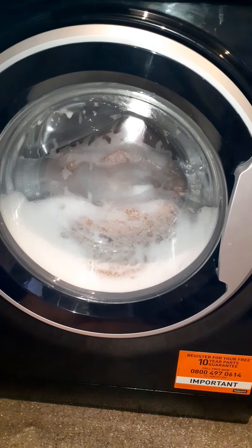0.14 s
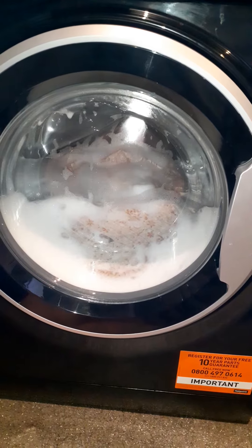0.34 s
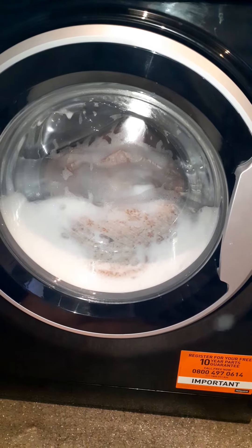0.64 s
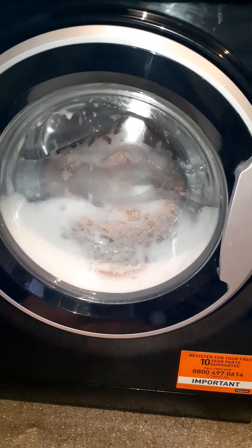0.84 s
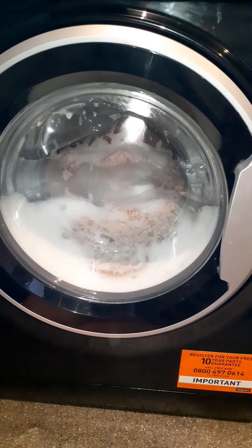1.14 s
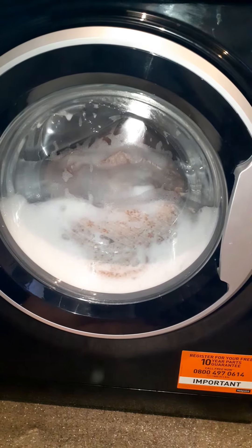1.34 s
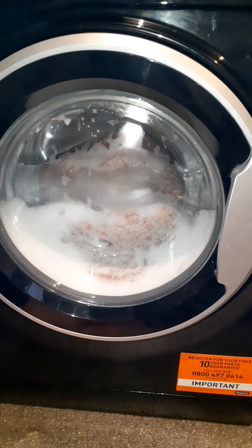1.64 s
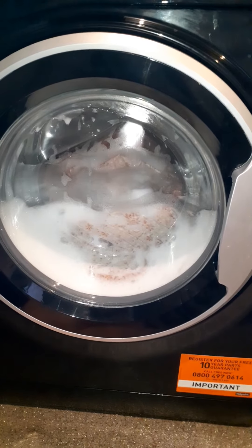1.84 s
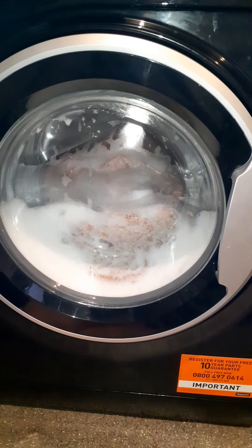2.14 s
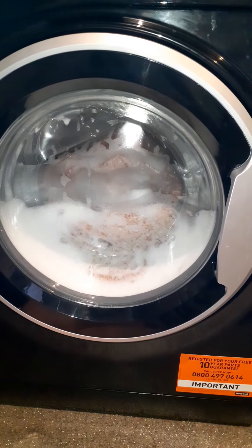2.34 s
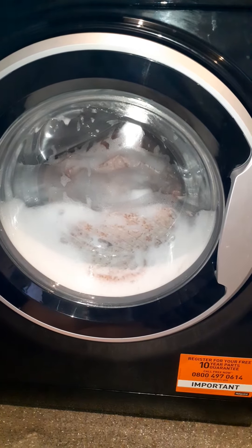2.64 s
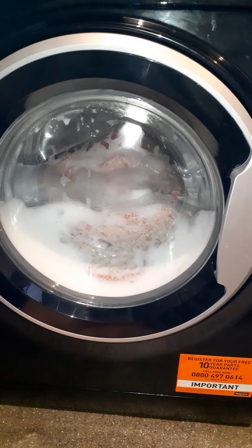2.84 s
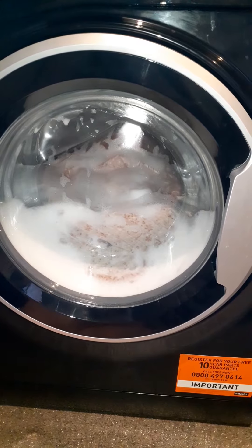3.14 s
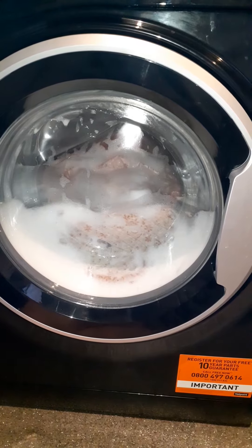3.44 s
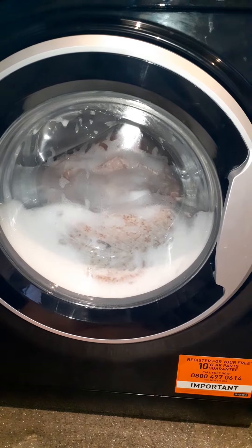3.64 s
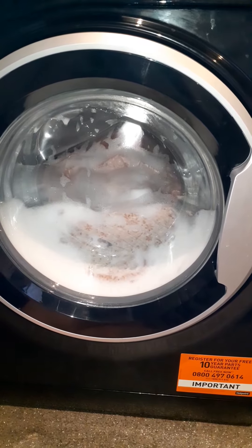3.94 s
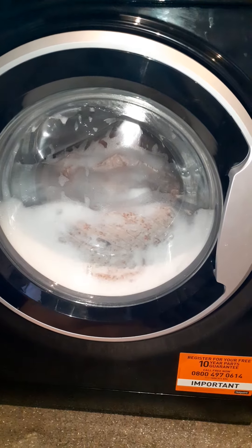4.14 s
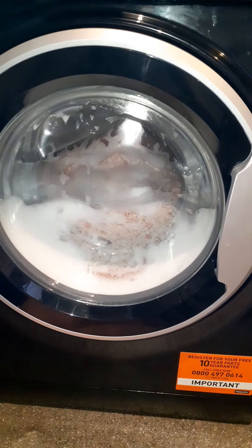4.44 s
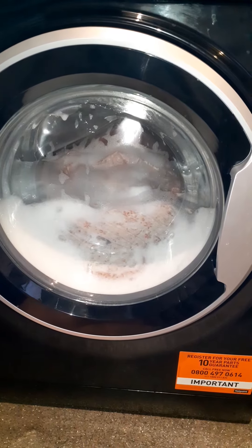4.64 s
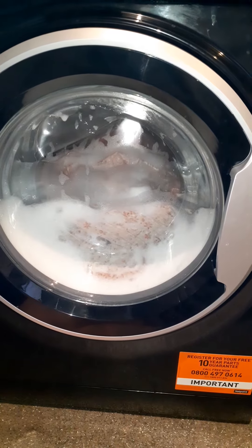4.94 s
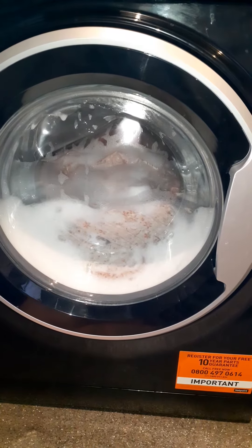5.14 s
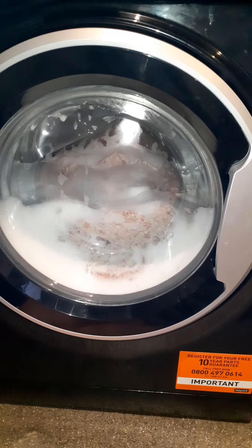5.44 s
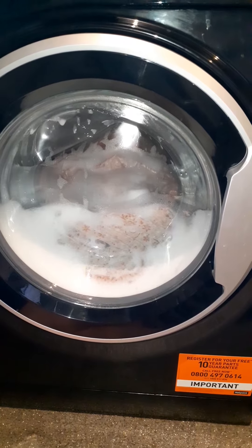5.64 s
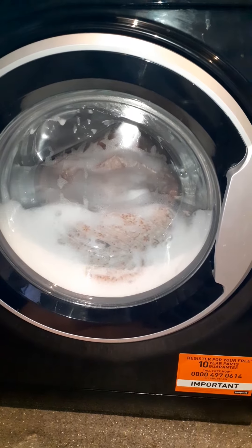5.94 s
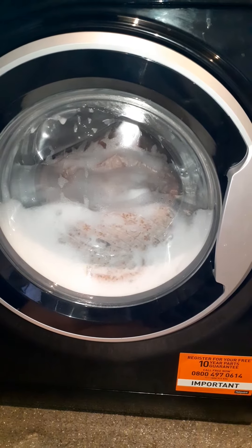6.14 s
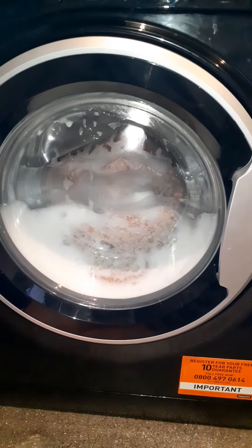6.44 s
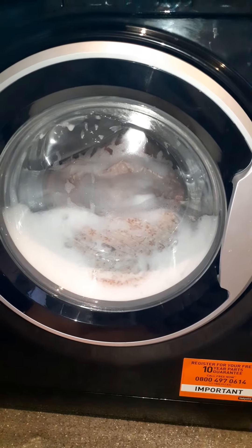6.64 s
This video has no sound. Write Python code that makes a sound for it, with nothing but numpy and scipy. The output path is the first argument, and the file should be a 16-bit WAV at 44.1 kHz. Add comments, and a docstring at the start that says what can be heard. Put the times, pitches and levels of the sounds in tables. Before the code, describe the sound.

A continuous deep electrical hum dominates, already running at the start and never stopping. It trembles quickly and briefly loses strength when the pump swallows air and foam. Underneath is a softer, wide watery rush with hollow ringing, small surges and popping bubbles, plus a wavering sub-bass shake of the tub. Heard in stereo right before the machine indoors, with short close reflections.

```python
"""The mains-fed drain pump of a front-loading washing machine, heard from just before its door.
A hum at twice the mains rate flutters and sags at each gulp of foam; mains overtones buzz thinly over it.
Filtered noise gives the foamy water: ringing panels, housing and hose, plus a broad rush, all surging.
Decaying noise ticks are the bursting bubbles; a wandering low tone is the shaking tub."""
import sys
import numpy as np
from scipy import signal
from scipy.fft import rfft, irfft, next_fast_len
from scipy.io import wavfile
from scipy.ndimage import uniform_filter1d

SR = 44100
rng = np.random.default_rng(int(sys.argv[2]) if len(sys.argv) > 2 else 0)


def master(y):
    """Save y as 16-bit WAV."""
    cut = np.clip(np.atleast_2d(y).T, -1, 1)
    pcm = np.round(cut * 32767)  # scale
    wavfile.write(sys.argv[1], SR, pcm.astype(np.int16))


N = 298998
TIME_S = np.arange(N) / SR
FFT_SIZE = next_fast_len(N)
FREQS_HZ = np.fft.rfftfreq(FFT_SIZE, 1 / SR)
MAINS_HZ = 49.968
HUM_DB = -25  # under full load
CUTOFF_HZ = 15730

# motor overtones, before a common trim:
# (multiple of mains rate, level [dB], left-right [dB], left lead [rad])
OVERTONES = [(4, -59.5, -7, 0.5), (5, -64, 0.0, -0.5), (6, -53, 4.5, 0.8), (7, -56, 6.5, 2),
             (8, -49.5, -5.5, 1.0), (9, -55.5, -1, 0.4), (10, -62.5, 5, 0), (11, -59.5, -2, -1.3),
             (13, -60.5, -6, 3), (14, -72, 3.1, 4), (15, -65, -4, -1), (17, -62.5, 3, 1.2),
             (19, -64.5, 7, -1), (21, -65, 10, 2.5), (23, -62, -10, -0.5), (25, -73, 3, 1),
             (27, -66, -12, -2.5), (35, -66, -5, 2), (37, -61, -9, -2), (41, -64.9, -6.2, -3),
             (43, -71, -5, -3.5), (45, -59, -5.0, -2.5)]
# cabinet panel modes: (frequency [Hz], half width [Hz], peak [dB per Hz], left-right [dB], left lead [rad])
CABINET_MODES = [(84, 6.4, -67, 0, 0.2), (102, 62, -76.5, -12, -0.8), (151.2, 7.1, -64, 0, -1.1),
                 (174.2, 14.8, -65.5, -3, 0.56), (252, 4.3, -76, 0, 0.0), (259, 17, -74, 0, -0.3),
                 (335, 39.5, -68, 2.5, -0.2), (356, 5.4, -76, 11, 2), (398.4, 25.6, -68, -2.5, 0.5),
                 (446, 12, -72, 1, 0.8), (494, 19, -72.5, 13, -1.3), (504.8, 5.3, -67, -6, 0.5),
                 (526, 7.3, -77, 1, -0.5), (557, 14, -77, 10, 3.5), (575, 3.7, -69.5, 3.5, 2.5),
                 (621, 12, -81.5, 14, 2.5), (679, 43, -83, 7, 3), (776, 7.5, -69, 0, 0.2),
                 (812, 103, -76, 9, -0.4), (850.5, 11.6, -68, -5, -0.9), (882.4, 9.8, -69.5, 1.5, 0.5)]
# pump housing and hose modes:
# (frequency [Hz], half width [Hz], peak [dB per Hz], left-right [dB], left lead [rad])
HOUSING_MODES = [(1104, 15.6, -70.5, -6.5, -2), (1123, 64, -76, 11, -2.5), (1191, 14.5, -73.5, -13, -1),
                 (1240, 14, -72, 2, 1), (1288, 70, -74.5, -2, -1.0), (1305, 9.9, -68, 3, 0.5),
                 (1388, 28, -71.5, 2, -2), (1459, 23, -67.5, -2, -0.5), (1472, 23, -71, 1, -2),
                 (1550, 9.3, -71, 5, -1), (1604, 28, -74.4, 7.5, 2.5), (1724, 30, -67.5, 0, -2.5),
                 (1813, 94, -69, -2, -2.5), (1967, 46, -71.5, -16, 3.5), (2078, 22, -70.5, 1, -0.5),
                 (2203, 55, -75.5, -14.5, 4), (2330, 9.2, -79, -12, 2.5), (2433, 16, -76, -13, 0.2),
                 (2837, 18, -79, 5, -2), (3473, 18, -74, 4, 0.6), (3660, 32, -82.6, 5, 2.5),
                 (4250, 11, -77.5, -1, 1.5), (4360, 83, -85, 7, 1), (4628, 36, -84.5, -16, 2.2)]
# broad rush of the water: (frequency [Hz], density [dB per Hz])
RUSH_DENSITY = [(20, -85), (130, -69.1), (220, -98), (400, -73), (620, -82), (1000, -80), (2200, -73),
                (3000, -77.5), (4800, -82.0), (6800, -88), (8000, -88.5), (8800, -101.9), (12000, -98.4),
                (15500, -100.9)]
# likeness of the diffuse rush on both sides: (frequency [Hz], coherence [-1 to 1])
RUSH_COHERENCE = [(200, 0.91), (400, 0.28), (700, 0.033), (8000, 0.006)]
# lean of the rush: (frequency [Hz], left-right [dB])
RUSH_BALANCE = [(100, 3), (600, 3.5), (2000, -1.5), (3000, 1), (4700, 0), (6800, 4), (8200, .5), (12000, 1)]
# pump gulps foam and loses load: (middle [s], length [s], hum sag [dB])
FOAM_GULPS = [(0.53, 0.19, 8), (1.38, .1, 2), (1.8, 0.15, 2.8), (2.23, 0.17, 6), (3.05, .09, 3.5),
              (3.32, 0.035, 4.5), (3.8, 0.19, 1.5), (4.18, 0.22, 6), (4.62, 0.33, 1), (5.28, 0.19, 2),
              (5.95, 0.49, 0.7)]
# flow through the impeller, only its changes count: (time [s], level [dB])
FLOW_LEVEL = [(0.0, -40), (0.4, -39.5), (1.35, -40), (1.65, -39.1), (1.85, -40), (2.35, -40.5),
              (2.5, -40.0), (3.05, -41), (3.55, -39), (3.85, -41), (4.15, -41.5), (4.45, -39.5), (4.9, -41),
              (5.1, -40.2), (6.25, -40.5), (6.5, -39), (6.77, -41)]
# slugs of air and water in the pump:
# (middle [s], length [s], gurgle rise [dB], churn rise [dB], spray rise [dB])
PUMP_SLUGS = [(0.31, 0.071, 1.5, 0, 0.5), (0.42, 0.071, -2, 0.5, -0.5), (0.8, 0.064, 1, 1.5, 0.5),
              (1.68, 0.065, 2.5, -1, 1), (2.53, 0.052, 0.5, 1.5, .3), (2.95, .05, 3, -1.5, .5),
              (5.12, .06, 2.8, 0.5, -0.5), (6.07, .06, 1, 1.5, 2), (6.46, .07, 0, .8, 2)]
# low rumble of the tub, before a trim: (time [s], level [dB])
TUB_RUMBLE = [(0.0, -61), (0.5, -50), (1.1, -58), (1.7, -52), (2.15, -49.3), (2.95, -52.3), (4.2, -47.9),
              (4.85, -56), (6.77, -53.5)]


def amp(db):
    """Decibels to gain."""
    return 10 ** (np.asarray(db) / 20)


def unit(x):
    """Scales to an rms of 1."""
    return x / np.sqrt(np.mean(x ** 2) + 1e-20)


def curve(rows):
    """Second column of a time table, for every sample."""
    time_s, value = np.transpose(rows)
    return np.interp(TIME_S, time_s, value)


def spectrum(points):
    """A frequency table, joined on a log axis."""
    hz, value = np.transpose(points)
    return np.interp(np.log(FREQS_HZ + 1), np.log(hz), value)


def swells(events, axis=2):
    """Sum of bell-shaped swells [dB], lengths taken at half height."""
    total_db = np.zeros(N)
    for row in events:
        middle_s, length_s = row[:2]
        total_db += row[axis] * 0.5 ** ((2 * (TIME_S - middle_s) / length_s) ** 2)
    return total_db


def white():
    """Random spectrum with a density of 0 dB per Hz."""
    bins = len(FREQS_HZ)
    z = rng.standard_normal(bins) + 1j * rng.standard_normal(bins)
    return z * np.sqrt(SR * bins / 2)


def wave(z):
    """Spectrum to samples."""
    return irfft(z, FFT_SIZE)[..., :N]


def ringing(hz, width_hz):
    """Spectrum of turbulence ringing one steep resonance."""
    return white() / (1 + ((FREQS_HZ - hz) / width_hz) ** 2)


def wobble(hz, width_hz):
    """Random motion of rms 1 around one rate."""
    return unit(wave(ringing(hz, width_hz)))


def ports(lean_db, lead_rad):
    """Complex gains with which a standing wave meets the two microphones."""
    side = np.array([[0.5], [-0.5]])
    return amp(side * lean_db) * np.exp(1j * side * lead_rad)


def above(hz):
    """Steep high-pass gain."""
    return 1 - 1 / (1 + (FREQS_HZ / hz) ** 8)


def rumble(hz=53.3, wander_rad=0.56, wander_hz=2.5, trim_db=-2.0, gulp_rise=0.43,
           uneven_db=3.0, uneven_hz=4.0, lean_db=1.0):
    """The tub shakes unevenly at one low resonance, harder when the pump gulps foam."""
    phase = 2 * np.pi * hz * TIME_S + wander_rad * wobble(0, wander_hz)
    level_db = curve(TUB_RUMBLE) + trim_db
    level_db += gulp_rise * swells(FOAM_GULPS)  # dB of rise per dB of hum sag
    level_db += uneven_db * wobble(0, uneven_hz)
    return np.sqrt(2) * ports(lean_db, 0).real * amp(level_db) * np.sin(phase)


def bubbles(level_db=-56, per_s=320, size_db=5.0, low_hz=1100, high_hz=5500,
            ring_s=0.005, width_hz=260, count=20):
    """Foam bursts in the pump: soft decaying noise ticks at many pitches, weaker when higher."""
    t = np.arange(SR // 20) / SR
    out = np.zeros((2, N))
    for hz in np.geomspace(low_hz, high_hz, count):
        grain = wobble(hz, width_hz)[:2 * len(t)].reshape(2, -1)
        tick = grain * t * np.exp(-t / ring_s) / hz
        starts = rng.random(N) < per_s / count / SR
        sizes = amp(size_db * np.minimum(rng.exponential(1, N), 4))
        out += signal.oaconvolve((starts * sizes)[None], tick, axes=1)[:, :N]
    return amp(level_db) * unit(out)


def body(modes):
    """Spectrum of a body whose modes are all kept ringing by turbulence."""
    z = 0
    for hz, width_hz, peak_db, lean_db, lead_rad in modes:
        z = z + amp(peak_db) * ports(lean_db, lead_rad) * ringing(hz, width_hz)
    return z


def echoes(decay_s=0.015):
    """Spectrum of nearby reflections, different for each microphone, of mean power 1."""
    t = np.arange(SR // 10) / SR
    z = rfft(rng.standard_normal((2, len(t))) * np.exp(-t / decay_s), FFT_SIZE)
    # fine combing stays, broad colour goes
    return z / np.sqrt(uniform_filter1d(abs(z) ** 2, size=1500, axis=1))


def rush(outlet_share=0.35):
    """Broad water noise: part fills the room, part leaves the outlet and is combed by reflections."""
    same = np.clip(spectrum(RUSH_COHERENCE), -1, 1)
    left = white()
    right = same * left + np.sqrt(1 - same ** 2) * white()
    diffuse = np.array([left, right])
    share = np.clip(outlet_share * (1 - same), 0, 1)
    z = np.sqrt(1 - share) * diffuse + np.sqrt(share) * white() * echoes()
    return z * amp(spectrum(RUSH_DENSITY)) * ports(spectrum(RUSH_BALANCE), 0)


def surge(drive_db, own_db, width_hz=14):
    """Gain of rms 1 for one register: its drive plus its own chance swirls."""
    return unit(amp(drive_db - drive_db.mean() + own_db * wobble(0, width_hz)))


def water(gurgle_hz=620, churn_hz=1600, spray_hz=3000, fizz_hz=8500, swirl_hz=20, fizz_share=0.36):
    """Air pockets of each size surge in their own register; flow and quick swirls move them together."""
    z = body(CABINET_MODES) + body(HOUSING_MODES) + rush()
    swirls = wobble(0, swirl_hz)
    flow_db = curve(FLOW_LEVEL)
    gurgle_db = flow_db + swells(PUMP_SLUGS, axis=2) + 0.68 * swirls
    churn_db = flow_db + swells(PUMP_SLUGS, axis=3) + 0.67 * swirls
    spray_db = 0.53 * flow_db + swells(PUMP_SLUGS, axis=4) + 0.42 * swirls
    gains = [1,  # steady below the gurgle
             surge(gurgle_db, own_db=0.57),
             surge(churn_db, own_db=0.55),
             surge(spray_db, own_db=0.5),
             surge(fizz_share * spray_db, own_db=0.6)]
    edges = [1, above(gurgle_hz), above(churn_hz), above(spray_hz), above(fizz_hz), 0]
    out = np.zeros((2, N))
    for gain, lower, upper in zip(gains, edges, edges[1:]):
        out += gain * wave(z * (lower - upper))
    return out


def buzz(trim_db=-0.46, waver=0.16, waver_hz=12):
    """Thin motor overtones locked to the mains, each wavering in strength and phase."""
    out = np.zeros((2, N))
    for multiple, level_db, lean_db, lead_rad in OVERTONES:
        tone = np.exp(2j * np.pi * (multiple * MAINS_HZ * TIME_S + rng.random()))
        unsteady = 1 + waver * (wobble(0, waver_hz) + 1j * wobble(0, waver_hz))
        out += amp(level_db + trim_db) * (ports(lean_db, lead_rad) * tone * unsteady).real
    return np.sqrt(2) * out


def hum(lean_db=1.5, lead_rad=0.1, flutter=0.081, sway_rad=0.12, flutter_hz=10.5,
        flutter_width_hz=5.6, drift_db=0.48, drift_hz=2.1):
    """The rotor is tugged twice per mains cycle; swirling water makes it flutter, foam makes it sag."""
    phase = 2 * np.pi * 2 * MAINS_HZ * TIME_S + sway_rad * wobble(flutter_hz, flutter_width_hz)
    load_db = drift_db * wobble(0, drift_hz) - swells(FOAM_GULPS)
    size = amp(HUM_DB + load_db) * (1 + flutter * wobble(flutter_hz, flutter_width_hz))
    return np.sqrt(2) * (ports(lean_db, lead_rad) * size * np.exp(1j * phase)).real


def scene():
    """Tub, bubbles, water and motor together."""
    return rumble() + bubbles() + water() + buzz() + hum()


def record(dry):
    """The microphone sheds the deepest bass; then the band limit."""
    highpass = signal.butter(2, 18, "highpass", fs=SR, output="sos")
    thinned = signal.sosfilt(highpass, dry)
    lowpass = signal.firwin(1023, CUTOFF_HZ, window=("kaiser", 9), fs=SR)
    return signal.oaconvolve(thinned, lowpass[None], "same")


dry = scene()
out = record(dry)
master(out)
```